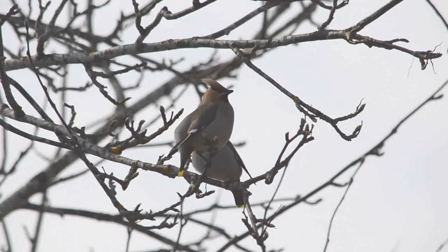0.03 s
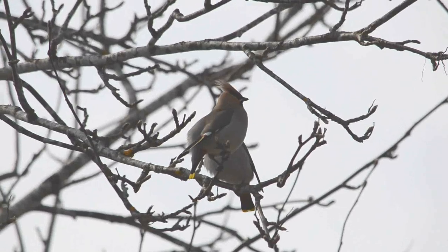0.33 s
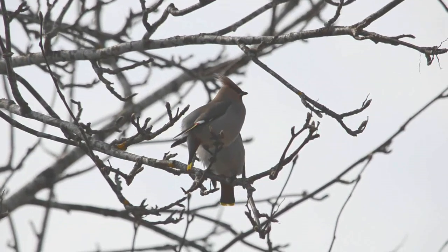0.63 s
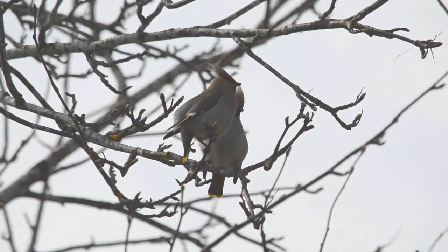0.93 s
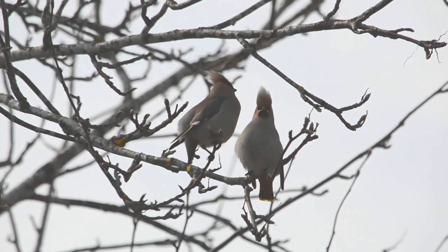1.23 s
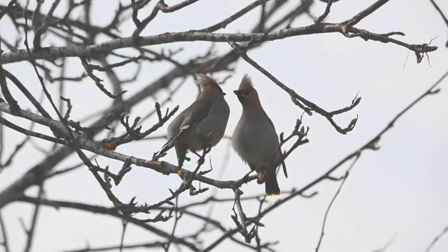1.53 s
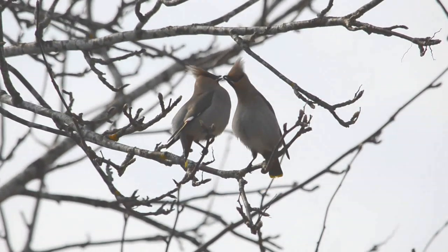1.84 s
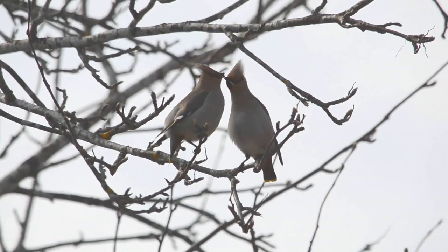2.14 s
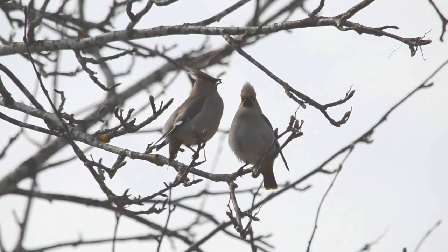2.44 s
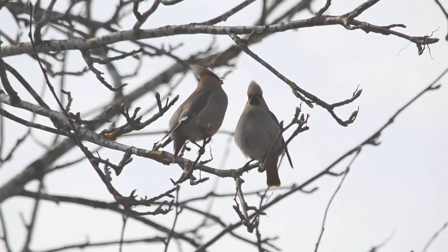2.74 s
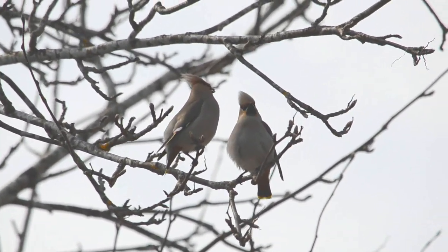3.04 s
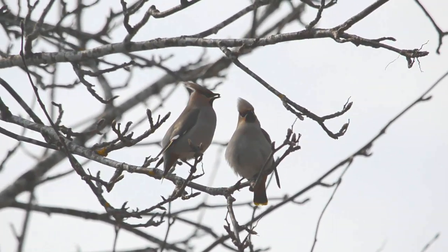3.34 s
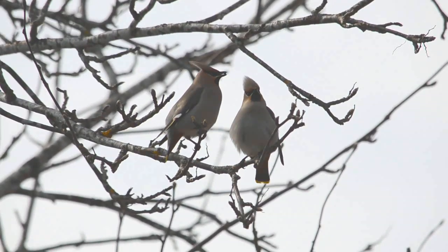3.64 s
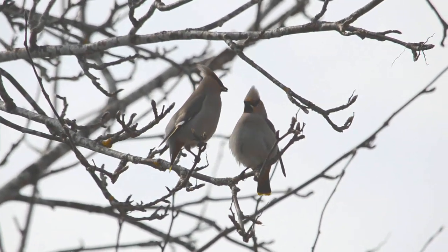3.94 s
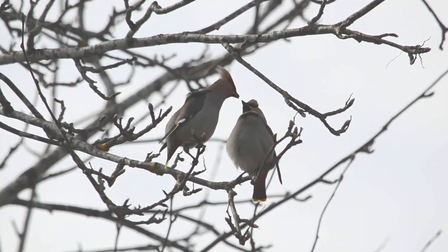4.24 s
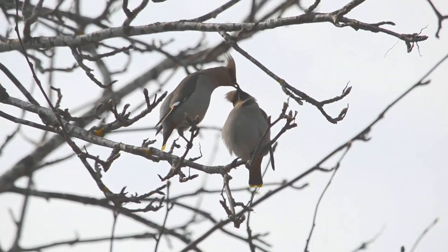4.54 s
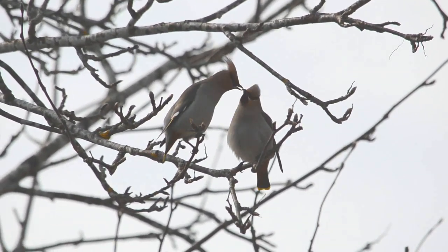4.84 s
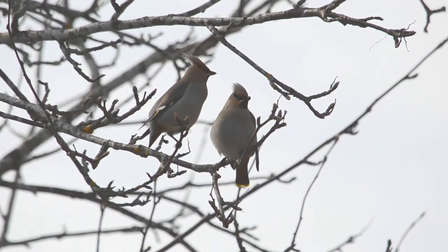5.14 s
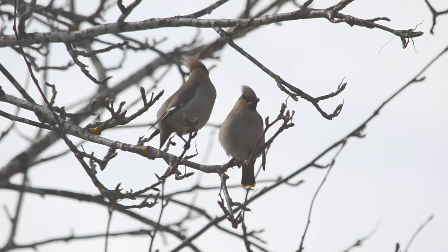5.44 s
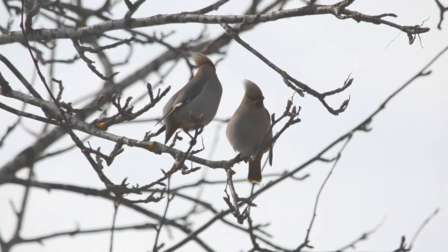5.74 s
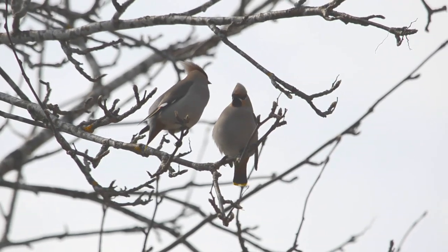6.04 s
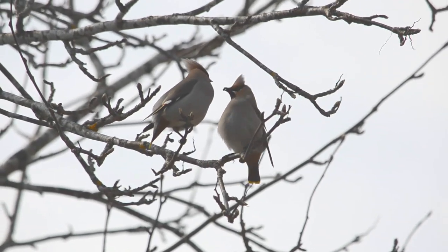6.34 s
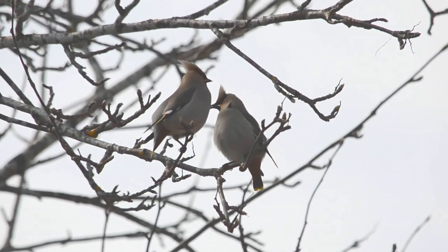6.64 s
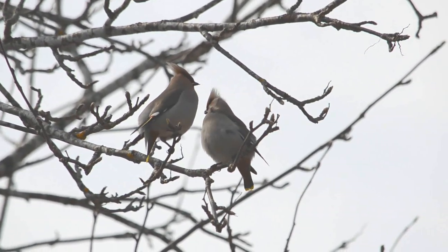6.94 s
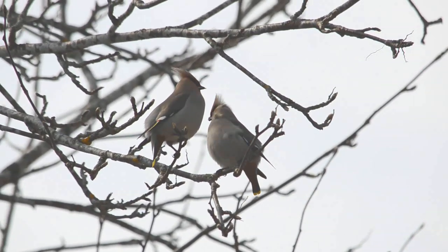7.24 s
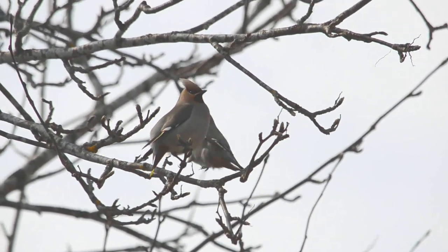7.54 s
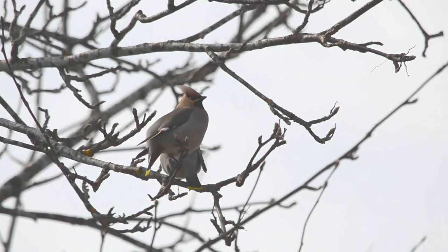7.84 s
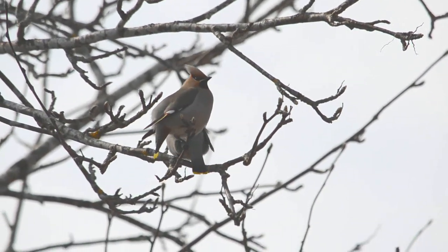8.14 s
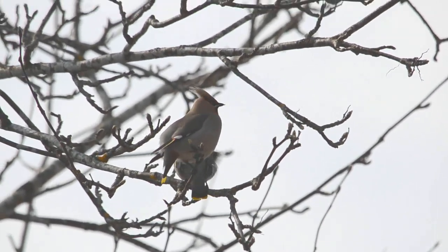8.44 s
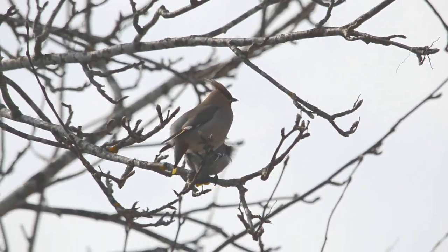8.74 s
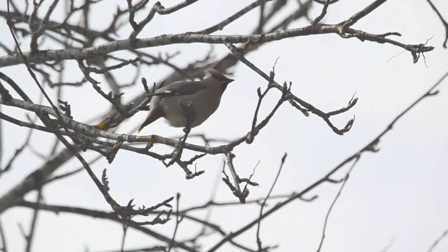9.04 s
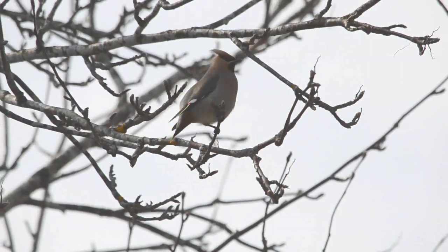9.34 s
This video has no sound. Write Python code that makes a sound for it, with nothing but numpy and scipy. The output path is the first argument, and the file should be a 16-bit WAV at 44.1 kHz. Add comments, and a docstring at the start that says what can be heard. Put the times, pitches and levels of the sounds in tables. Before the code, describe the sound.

Small birds in a bare tree give faint, very high trills in short bursts, each a quick string of falling whistles. Distant traffic hisses steadily and low wind buffets the microphone. A few twigs tick early on, and a farther bird pips softly. Faint chirps come before the strongest gust, about two thirds of the way through. The trills carry on, and wings rustle briefly at the end.

```python
"""Waxwings in a bare tree, heard on one microphone in the wind, with distant traffic hissing throughout.
The sound fades in on their trills: strings of short, falling whistles near 7 kHz, scattered by the
branches. A few twigs tick around 1 s, then a smaller, farther bird whistles and pips. Gusts buffet
the microphone, and a run of far chirps comes just before the strongest one, at 7 s.
The trills carry on, and at the end wings rustle as the birds shift."""
import sys
import numpy as np
from scipy import signal
from scipy.fft import rfft, irfft, next_fast_len
from scipy.io import wavfile
from scipy.ndimage import uniform_filter1d, map_coordinates

SR = 44100
rng = np.random.default_rng(int(sys.argv[2]) if len(sys.argv) > 2 else 0)


def transcribe(u):
    """Save the signal u as a 16-bit wav file named by the first command-line argument.

    u: samples, shape (n,) or (channels, n), limited to [-1, 1]; the rate is SR.
    q: integer samples, one column per channel.
    """
    v = np.clip(np.atleast_2d(u).T, -1, 1)
    q = np.round(v * 32767).astype(np.int16)
    wavfile.write(sys.argv[1], SR, q)


N = 422919
TIME = np.arange(N) / SR

# Fine turbulence at the microphone. Each row: frequency in Hz, relative density in dB.
EDDY_SPECTRUM = [(100, -35), (190, -4.5), (250, 1), (320, -2), (420, -7), (600, -15.5), (850, -32.5),
                 (1500, -69.5), (2500, -120)]


def amp(db):
    """Decibels to gain."""
    return 10 ** (np.asarray(db) / 20)


def curve(rows):
    """Rows of (seconds, value) joined by straight lines, one value per sample."""
    return np.interp(TIME, *np.transpose(rows))


def wobble(rate):
    """A smooth random curve with rate knots a second."""
    return map_coordinates(rng.standard_normal(int(N * rate / SR) + 4), [TIME * rate])


def filtered(x, response):
    """x shaped by a gain that is a function of frequency."""
    size = next_fast_len(N + SR // 2)
    return irfft(rfft(x, size) * response(np.fft.rfftfreq(size, 1 / SR)), size)[:N]


def noise(spectrum):
    """Noise of rms 1, coloured by rows of (Hz, dB)."""
    knots_hz, db = np.transpose(spectrum)
    x = filtered(rng.standard_normal(N), lambda hz: amp(np.interp(np.log(hz + 1), np.log(knots_hz), db)))
    return x / np.sqrt(np.mean(x ** 2))


def steadied(x, span):
    """x with its swells slower than span seconds evened out."""
    return x / np.sqrt(np.abs(uniform_filter1d(x ** 2, int(span * SR))) + 1e-9)


def add(track, start, sound):
    """Mix a sound into the track at start seconds."""
    part = track[round(start * SR):][:len(sound)]
    part += sound[:len(part)]


def background(traffic_db=-63.5, hiss_db=-83, whine_hz=4377, whine_db=-93):
    """Far traffic, the microphone's own hiss and a faint steady whine."""
    # The colours of traffic and hiss. Each row: frequency in Hz, relative density in dB.
    traffic_spectrum = [(50, 8), (130, -2), (750, 1), (1200, -3), (1800, -5.5), (3000, -12.5),
                        (4000, -18.5), (5000, -23), (6500, -40), (11000, -86.5)]
    hiss_spectrum = [(1500, -36), (4000, -12.5), (5500, 4.5), (8000, 2), (11000, -0.5), (15500, -3)]
    traffic = amp(traffic_db + .25 * wobble(5.2)) * noise(traffic_spectrum)
    whine = np.sqrt(2) * np.sin(2 * np.pi * np.cumsum(whine_hz + 8 * wobble(20)) / SR)
    return traffic + amp(hiss_db) * noise(hiss_spectrum) + amp(whine_db) * whine


def gusts(breeze_buffet_db=-74.5, breeze_eddy_db=-78.5):
    """Buffet and fine turbulence in relative dB: each gust swells and dies exponentially over a breeze."""
    # Each row: peak time in seconds, buffet and turbulence in relative dB, rise and fall in seconds.
    gust_peaks = [(.62, -65.5, -85, 0.11, 0.21), (1.29, -48.5, -82, 0.086, .12),
                  (1.55, -48.5, -68, 0.069, 0.15), (2.241, -40.5, -74, 0.048, 0.043),
                  (2.4, -42.5, -68, 0.045, .06), (2.74, -52, -70, 0.27, 0.09),
                  (3.49, -47.5, -79, 0.15, 0.28), (4.34, -45.5, -61.5, 0.14, 0.33),
                  (5.21, -47.5, -74, .06, 0.13), (5.53, -46.5, -59.5, 0.17, 0.6),
                  (5.9, -47.5, -57.5, 0.45, 0.17), (6.14, -46, -63, 0.12, .1), (6.32, -38, -63, 0.045, .05),
                  (6.51, -44, -77, 0.044, 0.028), (6.72, -56, -73, .1, .15),
                  (7.04, -28.5, -42.5, 0.054, 0.066), (7.16, -30.5, -47.5, .04, 0.063),
                  (7.42, -48.5, -66.5, 0.036, 0.057), (7.69, -53, -82, 0.053, .05),
                  (8.04, -61, -86, 0.024, .2), (9.28, -59, -80, 0.072, .5)]
    buffet_power, eddy_power = amp(breeze_buffet_db) ** 2, amp(breeze_eddy_db) ** 2
    for peak, buffet_db, eddy_db, rise, fall in gust_peaks:
        swell = np.exp(-np.maximum((peak - TIME) / rise, (TIME - peak) / fall))
        buffet_power += (amp(buffet_db) * swell) ** 2
        eddy_power += (amp(eddy_db) * swell) ** 2
    return 10 * np.log10(buffet_power), 10 * np.log10(eddy_power)


def wind(lump_db=3.5, rumble_hz=75, rumble_knee_db=-54):
    """Eddies hit the microphone in lumps; strong gusts shed finer, higher ones."""
    # Low buffeting on the microphone. Each row: frequency in Hz, relative density in dB.
    buffet_spectrum = [(10, -19.5), (25, -3.5), (50, 4), (90, 2), (140, -2), (200, -11), (280, -20),
                       (420, -39), (1500, -120)]
    buffet_db, eddy_db = gusts()
    lumps = amp(lump_db * wobble(45))
    buffet = steadied(lumps * noise(buffet_spectrum), span=.13)
    eddies = steadied(lumps * noise(EDDY_SPECTRUM), span=.17)
    # above the knee, the deepest rumble grows more slowly than the gust
    rumble = filtered(buffet, lambda hz: 1 / (1 + (hz / rumble_hz) ** 4))
    rumble_gain = amp(-.43 * np.maximum(buffet_db - rumble_knee_db, 0))
    buffet = buffet - rumble + rumble_gain * rumble
    return amp(buffet_db + 1) * buffet + amp(eddy_db - 1) * eddies


def puffs(width_cycles=.61, wake_db=9, wake_lead_s=.005, wake_rise_s=.0013, wake_decay_s=.014):
    """A strong eddy rocks the pressure at the microphone once or twice and briefly stirs up turbulence."""
    # Each row: centre time in seconds, envelope peak in dB, centre frequency in Hz.
    strong_eddies = [(1.558, -33, 112), (2.235, -30, 79), (2.39, -30, 108), (2.447, -31.5, 126),
                     (3.472, -35, 104), (4.335, -31.5, 190), (4.358, -34, 130), (6.326, -31.5, 95),
                     (6.995, -31, 330), (7.026, -20, 124), (7.06, -18, 140), (7.119, -19, 120)]
    pressure, wake = np.zeros((2, N))
    t = np.arange(-SR // 20, SR // 20) / SR
    age = np.maximum(t + wake_lead_s, 0)
    for centre, db, hz in strong_eddies:
        phase = 2 * np.pi * (hz * t + rng.random())
        add(pressure, centre + t[0], amp(db) * np.exp(-(hz * t / width_cycles) ** 2) * np.sin(phase))
        add(wake, centre + t[0], np.minimum(age / wake_rise_s, 1) * np.exp(-age / wake_decay_s))
    _, eddy_db = gusts()
    return pressure + amp(eddy_db + wake_db) * wake * noise(EDDY_SPECTRUM)


def glide(length, first_hz, last_hz):
    """A soft-edged, slightly unsteady whistle between two pitches."""
    count = int(length * SR)
    waver = map_coordinates(rng.standard_normal(12), [np.linspace(0, 11, count)])
    hz = np.linspace(first_hz, last_hz, count) + 30 * waver
    return np.sqrt(2) * signal.windows.tukey(count, .6) * np.sin(2 * np.pi * np.cumsum(hz) / SR)


def far_pips(slur_hz=100):
    """A far bird gives one low whistle, then thin pips with a slight upward slur."""
    # Each row: start in seconds, starting pitch in Hz, relative level in dB.
    pips = [(1.5, 4290, -79), (1.65, 4300, -75), (1.81, 4350, -73.5), (1.965, 4410, -77),
            (2.128, 4350, -77), (2.295, 4360, -80), (2.455, 4400, -81), (2.777, 4290, -77)]
    out = np.zeros(N)
    add(out, start=1.243, sound=amp(-69.5) * glide(length=.086, first_hz=2686, last_hz=2907))
    for start, hz, db in pips:
        add(out, start, amp(db) * glide(length=.03, first_hz=hz, last_hz=hz + slur_hz))
    return out


def far_chirps(spacing_s=.0612, pitch_spread=.03):
    """A far bird's run of rising chirps, each at a slightly different pitch."""
    # Loudness along the run. Each row: time in seconds, relative level in dB.
    run_levels = [(5.45, -76), (5.57, -75), (5.7, -76), (5.95, -73.5), (6.2, -75.5), (6.55, -76)]
    times, levels = np.transpose(run_levels)
    out = np.zeros(N)
    for start in np.arange(times[0], times[-1], spacing_s):
        pitch = 1 + pitch_spread * rng.standard_normal()
        chirp = glide(length=.0286, first_hz=2980 * pitch, last_hz=3680 * pitch)
        add(out, start, amp(np.interp(start, times, levels)) * chirp)
    return out


def twigs(ring_hz=2500, t60=.0014, crack=.09):
    """Dry ticks in the tree: a cycle or two of stiff wood with a tiny crack."""
    # Each row: start in seconds, envelope peak in dB.
    ticks = [(0.817, -40), (0.836, -47), (1.0384, -36), (1.1393, -45), (1.258, -42.5)]
    out, t = np.zeros(N), np.arange(SR // 100) / SR
    for start, db in ticks:
        wood = np.sin(2 * np.pi * ring_hz * t) + crack * rng.standard_normal(len(t))
        add(out, start, amp(db - 60 * t / t60) * wood)
    return out


def wings():
    """Feathers brush the air in quick, uneven strokes."""
    # The rustle's swell. Each row: time in seconds, level in dB.
    swell = [(9.2, -76), (9.34, -68.5), (9.41, -61), (9.47, -56.5), (9.54, -60), (9.59, -62.5)]
    # Its colour. Each row: frequency in Hz, relative density in dB.
    feather_spectrum = [(100, -37), (350, 7), (800, 2), (1400, -2), (2200, -4.5), (3200, -27), (6000, -42),
                        (12000, -46)]
    return amp(curve(swell) + .68 * wobble(40)) * noise(feather_spectrum) * (TIME > swell[0][0])


def branches(x, t60=.22, first_echo_s=.0037, trunk_echo_s=.026):
    """Sparse, weak reflections from the branches and one clearer echo off a trunk."""
    t = np.arange(SR // 2) / SR
    tail = rng.standard_normal(len(t)) ** 3 * amp(-60 * t / t60) * (t > first_echo_s)
    tail /= np.linalg.norm(tail)
    tail[int(trunk_echo_s * SR)] += amp(-6)  # 6 dB under all the branches together
    return signal.fftconvolve(x, tail / np.linalg.norm(tail))[:N]


def trill_note(length, top_hz, knee_hz, rise_s=.005, drop_s=.0074, rise_hz=900, drop_hz=950):
    """One waxwing whistle: the pitch flicks up, slides down to a knee, then plunges as the note closes."""
    t = np.arange(int((length + drop_s / 2) * SR)) / SR
    opening = np.clip(1 - t / rise_s, 0, 1)
    closing = np.clip((t - length + drop_s) / drop_s, 0, None)
    slide = np.clip((t - rise_s) / max(length - rise_s - drop_s, .002), 0, 1) ** .8
    waver = map_coordinates(rng.standard_normal(40), [t * 300])
    hz = top_hz + (knee_hz - top_hz) * slide - rise_hz * opening ** 2 - drop_hz * closing ** 2
    phase = 2 * np.pi * np.cumsum(hz + 40 * waver) / SR
    swell = (1 - opening ** 4) * amp(-6.5 * closing ** 2 - .78 * slide + 1.4 * waver)
    return np.sqrt(2) * swell * (np.sin(phase) + amp(-23.5) * np.sin(2 * phase))


def trill(span, length, top_hz, knee_hz, climb_hz, warm_up_notes=.55, spread_hz=55, spread_db=1.3):
    """A trill warms up, sinks and ends softly. Each note: delay and length in s, top and knee in Hz, dB."""
    k = np.arange(round(abs(span) / .052) + 1)  # about one note every 52 ms
    off_pitch, off_level = rng.standard_normal((2, len(k)))
    flat_hz = climb_hz * np.exp(-k / warm_up_notes)
    sink_hz = 18 * k
    pace = 1 - 2.6e-4 * flat_hz  # the low first notes are also quicker
    beats = np.cumsum(pace) - pace
    delays = span * beats / max(beats[-1], .5)
    tops = top_hz - flat_hz - sink_hz + spread_hz * off_pitch
    is_last = (k > 0) & (k == k[-1])
    db = spread_db * off_level - .06 * k - 2.5 * is_last
    return list(zip(delays, length * pace, tops, knee_hz - sink_hz, db))


def waxwings(gain_db=.6, pip_lead_s=.028, pip_length_s=.014, pip_below_hz=455, pip_slide_hz=180):
    """The flock's trills: the part that comes straight to the microphone and the part the branches get."""
    # Each row: first and last note's start in seconds, note length in seconds, top and knee pitch in Hz,
    # opening climb in Hz, relative level in dB, scattered share in dB, 1 for an opening pip.
    trills = [(0.078, .479, .039, 7620, 6750, -2.5, -73, -8, 0),
              (0.494, .601, 0.035, 7780, 6740, 0, -82, -10, 0),
              (0.7, .845, 0.029, 7480, 6670, 350, -77, -10, 1),
              (.952, .952, .015, 6600, 6440, 0, -76, -11, 0),
              (1.692, 1.857, .032, 8100, 7100, 348.5, -77.5, -6, 1),
              (1.75, 1.911, 0.036, 7500, 6380, 0, -75, -5, 1),
              (2.285, 2.445, 0.031, 7150, 6430, 349, -80.5, -12, 1),
              (2.564, 2.723, 0.044, 7270, 6340, 300, -75.5, -12, 1),
              (3.365, 3.419, 0.04, 7330, 6360, 300, -72.5, -13, 1),
              (3.47, 3.694, .04, 7320, 6500, 281, -67.5, -9.5, 1),
              (4.051, 4.09, 0.029, 7780, 6900, 2, -78, -5, 0),
              (4.301, 4.452, .04, 7300, 6500, 550, -82, -4, 0),
              (4.452, 4.462, 0.045, 7570, 6480, 0, -79, -9, 0),
              (4.702, 4.748, 0.038, 7500, 6750, 200, -74, -14, 0),
              (5.82, 5.82, 0.041, 7400, 6740, 0, -78, -6, 0),
              (5.875, 6.209, 0.046, 6600, 5880, 650, -73.5, -11, 0),
              (6.376, 6.64, 0.039, 7140, 6330, 499, -76, -9, 1),
              (6.427, 6.424, 0.04, 7550, 6670, -3, -74, -2, 0),
              (6.5, 6.549, .032, 8570, 7000, 555, -72, -11, 1),
              (7.068, 7.068, .03, 7000, 6450, 0, -87, -12, 0),
              (7.297, 7.401, .038, 7000, 6260, 500, -86, -9, 0),
              (7.452, 7.653, 0.036, 7520, 6500, 448.5, -74.5, -2.5, 0),
              (7.838, 7.937, .034, 7870, 6850, 450, -77.5, -9, 1),
              (8.071, 8.166, 0.037, 7700, 6730, 400, -74, -10, 1),
              (8.482, 8.588, 0.034, 7470, 6700, 254, -87, -9, 1),
              (9.26, 9.32, 0.03, 8300, 7650, 352, -84, -9, 0),
              (9.532, 9.535, 0.039, 7600, 6800, 0, -71, -13, 1)]
    direct, indirect = np.zeros((2, N))
    for start, last, length, top_hz, knee_hz, climb_hz, level_db, scatter_db, has_pip in trills:
        notes = trill(last - start, length, top_hz, knee_hz, climb_hz)
        if has_pip:
            pip_hz = top_hz - climb_hz - pip_below_hz
            notes.append((-pip_lead_s, pip_length_s, pip_hz, pip_hz - pip_slide_hz, -.5))
        share = amp(scatter_db)
        for delay, *shape, db in notes:
            note = amp(level_db + db + gain_db) * trill_note(*shape)
            add(direct, start + delay, np.sqrt(1 - share ** 2) * note)
            add(indirect, start + delay, share * note)
    return direct, indirect


def scene(tick_scatter_db=-16, far_direct_db=-4, far_scatter_db=-3):
    """Birds and twigs among the branches, over wind and distant traffic, in mono."""
    direct, indirect = waxwings()
    ticks = twigs()
    far_birds = far_pips() + far_chirps()
    scatter = branches(indirect + amp(tick_scatter_db) * ticks + amp(far_scatter_db) * far_birds)
    calls = direct + amp(far_direct_db) * far_birds
    return (calls + ticks + scatter + wings() + wind() + puffs() + background())[None]


def record(dry):
    """The sound fades in, and the recorder keeps nothing above 15.8 kHz."""
    # Each row: time in seconds, gain in dB.
    fade_in = [(0, -62), (.1, -33.5), (.21, -25), (.33, -11.5), (.4, -4.5), (.5, -1), (.62, 1)]
    return filtered(amp(curve(fade_in)) * dry[0], lambda hz: hz < 15800)[None]


dry = scene()
out = record(dry)
transcribe(out)
```